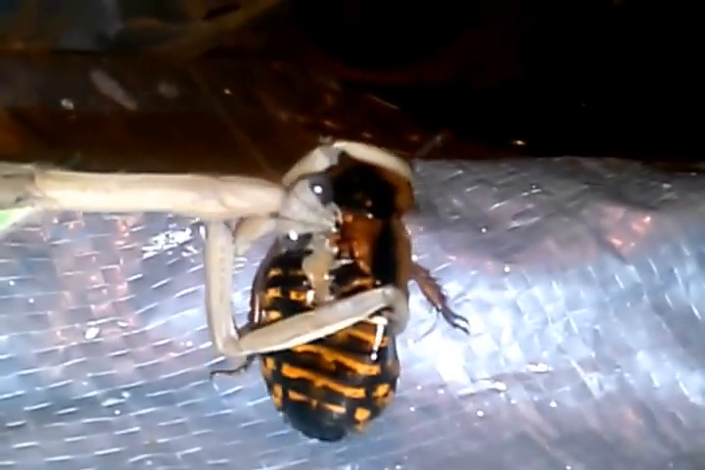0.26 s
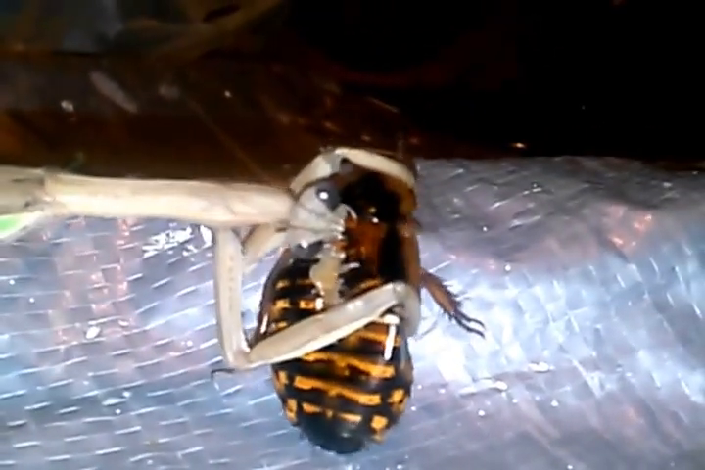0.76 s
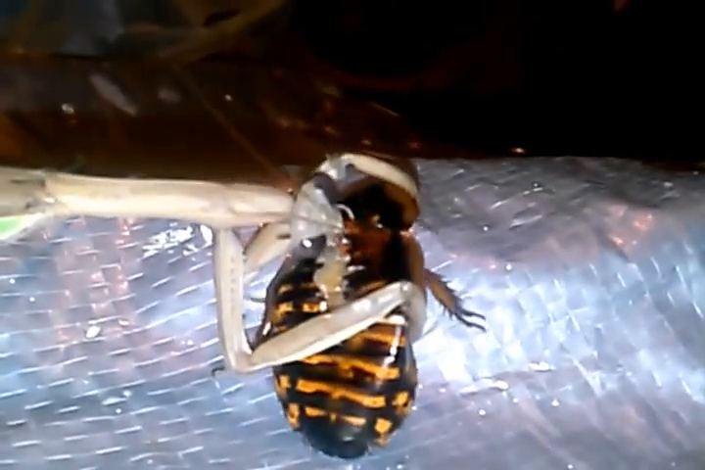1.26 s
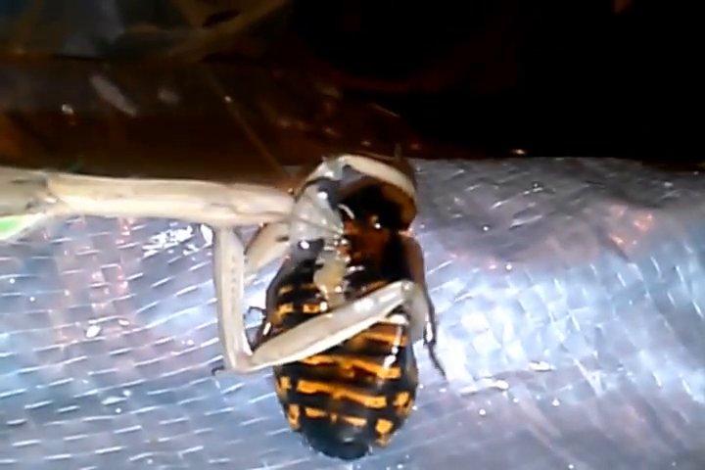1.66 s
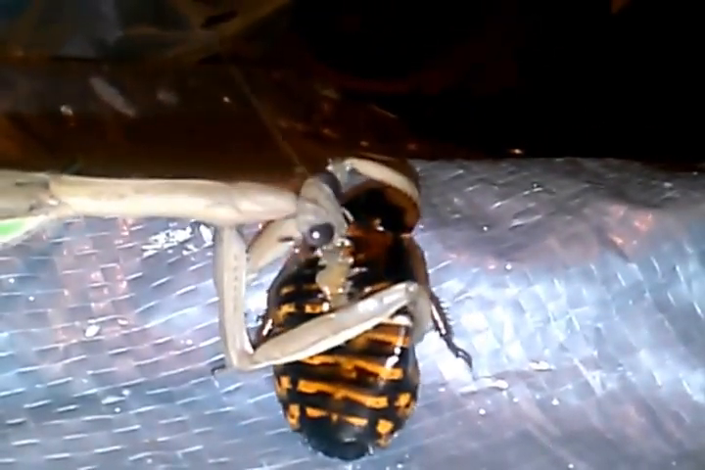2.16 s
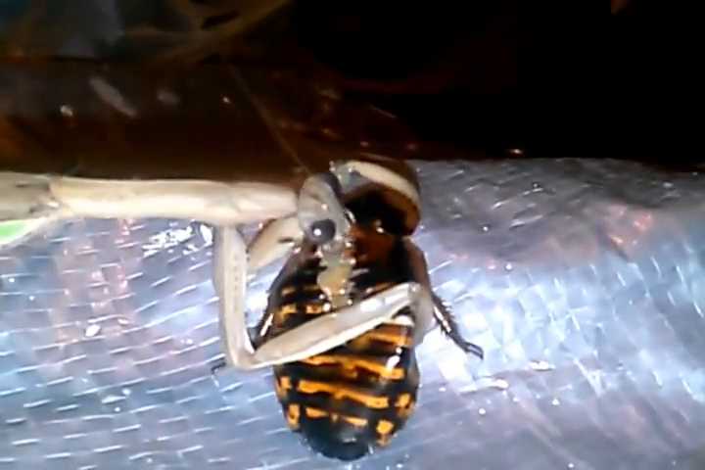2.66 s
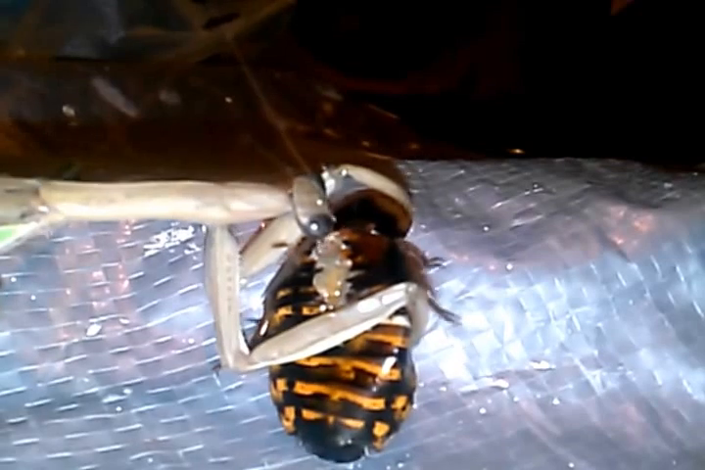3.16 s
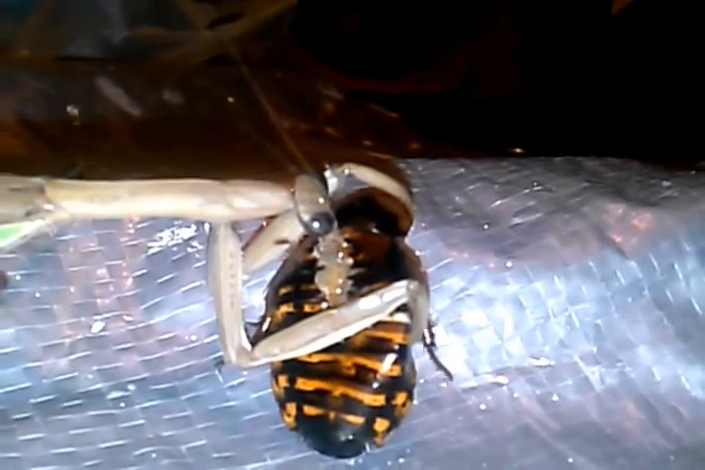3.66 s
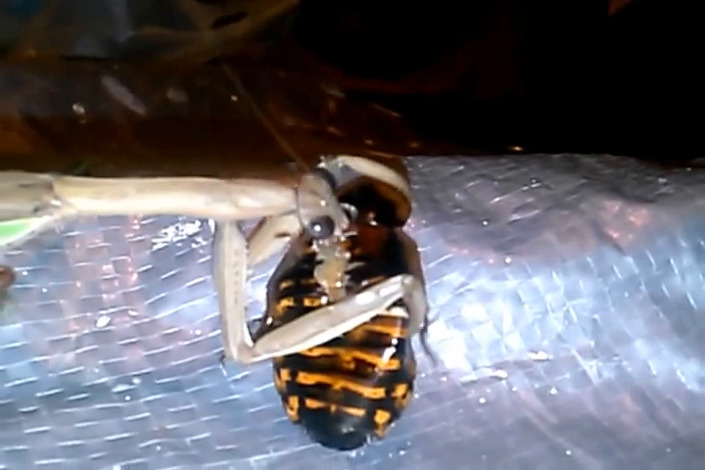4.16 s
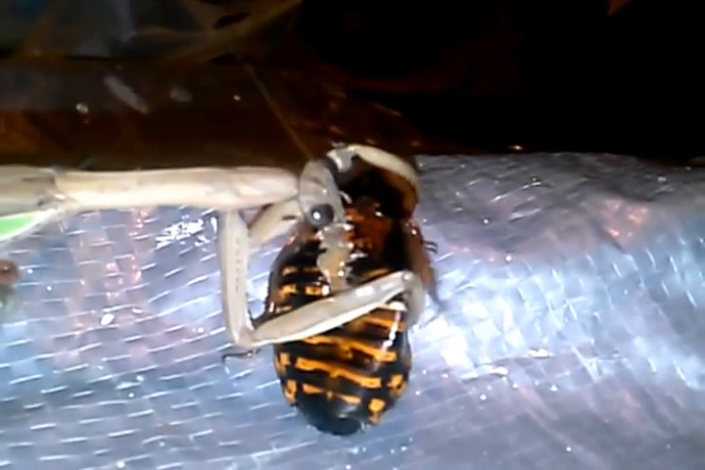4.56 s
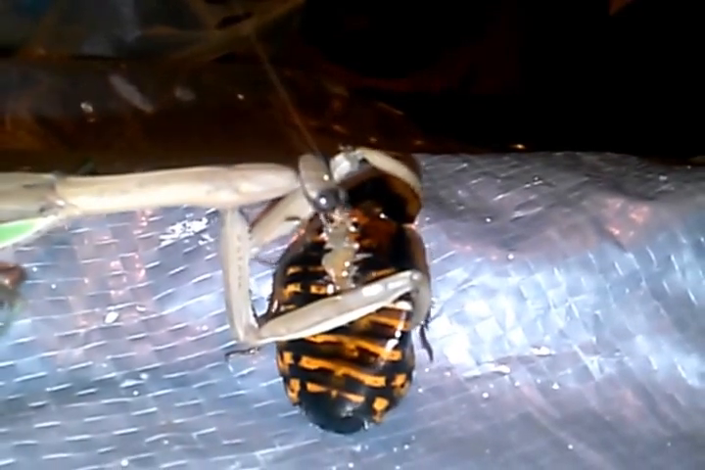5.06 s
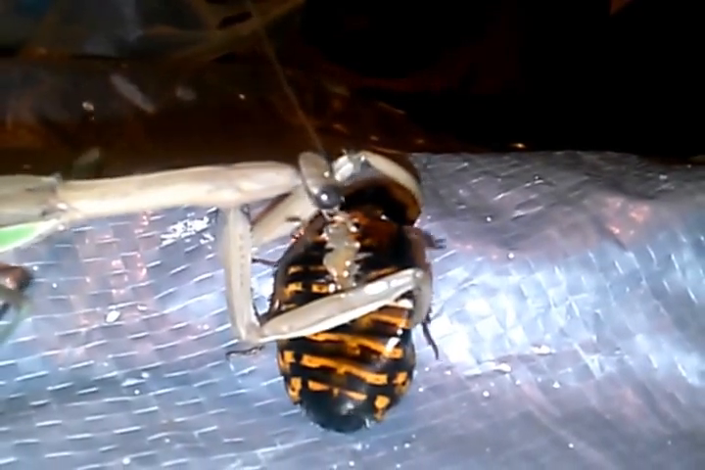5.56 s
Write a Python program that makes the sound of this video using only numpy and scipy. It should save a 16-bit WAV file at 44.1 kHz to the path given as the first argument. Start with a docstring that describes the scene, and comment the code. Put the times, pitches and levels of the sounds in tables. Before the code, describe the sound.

A mantis chewing a roach: a quick flurry of small crunches and handling bumps, then sparse single ticks above quiet rumble and airy hiss.

```python
"""Shell ticks over a low rumble, with rubbing, a short groan and soft thumps: a mantis chews a roach in a quiet room,
heard close by one hand-held microphone. Ticks, thumps and rubbing are impulses ringing damped modes; the groan is a
sliding tone from the hand on the housing. Rumble, drone, murmur and a hiss that swells and sinks are noise in
flickering bands; the background dips briefly now and then. Faint narrow patches, mostly near 3 and 5 kHz, are tones
of shivering pitch."""
import sys
import numpy as np
from scipy import signal
from scipy.fft import rfft, irfft, next_fast_len
from scipy.io import wavfile

SR = 44100
rng = np.random.default_rng(int(sys.argv[2]) if len(sys.argv) > 2 else 0)


def undo_db(level):
    """Turn decibels back into plain size, where 20 dB means ten times bigger."""
    steps = np.asarray(level, float) / 20
    return 10 ** steps


def transcribe(signal):
    """Save signal, clipped to [-1, 1], as a 16-bit WAV file at the path in sys.argv[1]."""
    frames = np.atleast_2d(signal).T
    limited = np.clip(frames, -1, 1)
    pcm = np.round(limited * 32767).astype(np.int16)
    wavfile.write(sys.argv[1], SR, pcm)


N = 256662   # length [samples]

# low background, restless while the hand settles: (time [s], deep rumble level [dB],
# level of the thin murmur between drone and hiss [dB])
LOW_AIR = [(0, -35.5, -63.5), (.55, -37, -57), (.85, -40.5, -58), (1.0, -43.5, -64), (1.6, -39, -59.5),
           (2.15, -41.5, -68), (2.55, -42.5, -62), (3.35, -38.5, -58), (3.85, -44.5, -62),
           (4.3, -44, -61.5), (4.55, -41.5, -60), (5.1, -43, -58), (5.82, -42.5, -61.5)]


def rms_one(x):
    """Normalization: divides a signal by its root mean square."""
    return x / np.sqrt(np.mean(x ** 2) + 1e-20)


def in_time(rows):
    """Linear interpolation: turns timed rows into one curve per column."""
    times, *columns = np.transpose(rows)
    return [np.interp(np.arange(N) / SR, times, column) for column in columns]


def drift(rate):
    """Low-passed noise: a chance curve of spread 1 from two equal poles at rate [Hz]."""
    pole = np.exp(-80 * np.pi * rate / SR)   # one step is 40 samples
    steps = rng.standard_normal(N // 40 + 2002)
    slow = signal.lfilter([1], [1, -2 * pole, pole * pole], steps)[2000:]
    return np.interp(np.arange(N) / 40, np.arange(len(slow)), rms_one(slow))


def ring(length, hz, t60):
    """Damped oscillation: a sine under an exponential decay of 60 dB in t60 [s]."""
    t = np.arange(length) / SR
    return np.sin(2 * np.pi * hz * t) * undo_db(-60 * t / t60)


def coloured(spectrum, patchy_db, flicker, tilt_db=0, count=12):
    """Subband modulation: shaped noise in overlapping bands that flicker partly together; rms 1."""
    size = next_fast_len(N)
    hz, density_db = np.transpose(spectrum)
    octave = np.log2(np.maximum(np.arange(size // 2 + 1) * SR / size, 1e-3))
    shape = undo_db(np.interp(octave, np.log2(hz), density_db, -200, -200))
    noise = rfft(rng.standard_normal(size)) * shape
    centres = np.linspace(np.log2(hz[1]), np.log2(hz[-2]), count)
    out, together = 0, drift(flicker)
    for k in range(count):
        weight = np.interp(octave, centres, np.arange(count) == k)
        band = irfft(noise * weight, size)[:N]
        sway_db = patchy_db * (0.54 * together + drift(flicker))
        # the lowest band takes minus half the tilt, the top quarter plus a quarter of it
        out = out + band * undo_db(sway_db + tilt_db * (min(k / count, .75) - .5))
    return rms_one(out)


def ticks():
    """Impulse response of modes: each crack rings near 1 kHz, with its own share of dry treble, and splinters."""
    # shell ticks: (time [s], strike level [dB], ring frequency [Hz], dry crack re ring [dB])
    strikes = [(0.064, -38.5, 960, -20), (0.177, -33, 1340, -25), (0.1941, -28.5, 1120, -6),
               (0.258, -40, 1060, -16), (.377, -38.5, 885, -3), (0.557, -30, 860, -23),
               (.786, -39, 1160, -20), (.808, -41, 1020, -23), (1.633, -38, 1300, -10),
               (2.581, -38.5, 1210, -18), (3.317, -37, 1310, -16), (3.6512, -32, 1250, 7.5),
               (3.652, -38, 1940, -3), (3.6528, -38, 1310, -5), (4.446, -38.5, 1140, -1)]
    # short modes of the dry crack: (frequency [Hz], level [dB], t60 [s])
    treble_modes = [(1820, 0, 0.0041), (2600, 2, 0.0035), (3300, -1, 0.0032), (4900, -5, 0.006)]
    ring_cycles = 12.8   # cycles of the body ring in its t60
    splinter_db, splinter_t60_s, splinters_per_s = -11, .025, 1200
    contact_hz = 3400   # low-pass that softens every contact

    crack = 0
    for k, (hz, mode_db, t60) in enumerate(treble_modes):
        crack = crack + (-1) ** k * undo_db(mode_db) * ring(4000, hz, t60)
    splinter = undo_db(splinter_db - 60 * np.arange(4000) / SR / splinter_t60_s)
    out = np.zeros(N + 4000)
    for start, strike_db, hz, crack_db in strikes:
        body = ring(4000, hz, ring_cycles / hz)
        chance = rng.random(4000) < splinters_per_s / SR
        slips = splinter * rng.standard_normal(4000) * chance
        slips[0] = 1   # the first break
        tick = signal.fftconvolve(slips, body + undo_db(crack_db) * crack)[:4000]
        out[round(start * SR):][:4000] += undo_db(strike_db) * tick
    return signal.sosfilt(signal.butter(2, contact_hz, fs=SR, output="sos"), out[:N])


def rub():
    """Stochastic excitation of modes: dense uneven slips set off short rings near 1 kHz."""
    # rough rubbing: (time [s], level [dB])
    strokes = [(0.05, -72), (0.07, -53), (0.086, -63), (0.138, -53.5), (0.185, -56), (0.225, -46),
               (0.322, -61.5), (0.372, -56), (0.42, -59)]
    # modes that the slips excite: (frequency [Hz], relative level [dB], t60 [s])
    rub_modes = [(840, -4, 0.042), (1017, 8, 0.036), (1140, -4, 0.02), (1390, -2, 0.018)]
    slips_per_s = 900

    silent_before, silent_after = (strokes[0][0] - .01, -120), (strokes[-1][0] + .02, -120)
    stroke_db, = in_time([silent_before] + strokes + [silent_after])
    # the modes share the moments of slip but not their strengths
    slips = rng.standard_normal((len(rub_modes), N)) * (rng.random(N) < slips_per_s / SR)
    rough = 0
    for row, (hz, mode_db, t60) in zip(slips, rub_modes):
        rough = rough + undo_db(mode_db) * signal.fftconvolve(row, ring(3000, hz, t60))[:N]
    return undo_db(stroke_db) * rms_one(rough)


def groan():
    """Frequency and amplitude modulation: a sliding, unsteady tone of the housing with a third harmonic."""
    # two groans, each a list of: (time [s], frequency [Hz], level [dB])
    glides = [
        [(0.12, 300.4, -77), (0.128, 304, -37), (0.136, 322, -32.5), (0.155, 287, -68)],
        [(0.172, 353, -42), (0.179, 342, -35.5), (0.187, 360, -42), (0.194, 357, -40.5), (0.222, 248.6, -30.5),
         (0.234, 241, -28.5), (0.26, 239, -59)],
    ]
    rough_db, rough_hz = 2.2, 56   # chance swing of the level
    shiver_share, shiver_hz = .05, 69   # chance swing of the pitch, as a share of it
    overtone_db = -16

    out, t = np.zeros(N), np.arange(N) / SR
    for rows in glides:
        hz, tone_db = in_time(rows)
        fade = np.clip(np.minimum(t - rows[0][0], rows[-1][0] - t) / 0.0066, 0, 1)
        phase = 2 * np.pi * np.cumsum(hz * (1 + shiver_share * drift(shiver_hz))) / SR
        tone = np.sin(phase) + undo_db(overtone_db) * np.sin(3 * phase)
        out += np.sqrt(2) * undo_db(tone_db + rough_db * drift(rough_hz)) * fade * tone
    return out


def thumps():
    """Heavy damping: soft pushes on the housing start a low swing that dies fast, its onset dulled."""
    # pushes: (time [s], push level [dB], ring frequency [Hz], t60 [s])
    pushes = [(0.087, -39, 75, 0.075), (.104, -26.5, 110, 0.052), (.262, -37, 298, 0.057),
              (0.223, -22.5, 31, 0.18), (0.445, -27, 30, 0.091), (0.561, -20.5, 34.8, 0.059),
              (.807, -18.5, 97, 0.052), (0.861, -24.5, 91, 0.039), (1.06, -29.5, 28.7, 0.3),
              (1.171, -23, 28, 0.12), (1.34, -33.5, 204, 0.067), (2.35, -31, 35, 0.11),
              (2.692, -28, 35.3, 0.054), (5.049, -25, 47, 0.14)]
    out = np.zeros(N + 9000)
    for start, push_db, hz, t60 in pushes:
        out[round(start * SR):][:9000] += undo_db(push_db) * ring(9000, hz, t60)
    return signal.sosfilt(signal.butter(2, 450, fs=SR, output="sos"), out[:N])


def trill():
    """Frequency modulation: fast chance shivers spread each short tone into a narrow band."""
    # narrow airy patches: (start [s], length [s], frequency [Hz], level [dB])
    patches = [(0.49, 0.17, 3110, -55), (1.066, .092, 3150, -55), (1.09, 0.086, 4430, -50.5),
               (1.403, 0.032, 3190, -49), (1.483, .06, 2820, -54), (1.698, 0.043, 2990, -49),
               (1.768, .035, 3030, -56), (1.827, 0.047, 2940, -51), (2.304, 0.096, 3180, -48),
               (2.83, 0.15, 3110, -52.5), (2.893, 0.08, 4640, -51), (3.521, 0.018, 2920, -45),
               (4.497, 0.13, 5020, -54), (4.666, 0.14, 3006, -54), (5.056, 0.1, 2814, -57),
               (5.383, 0.086, 2920, -56), (5.477, 0.095, 2940, -51.5), (5.5, 0.071, 3200, -54),
               (5.644, 0.037, 2980, -51)]
    width_share, shiver_hz = .017, 210.0   # chance swing of the pitch, as a share of it
    throb_db, throb_hz = 2.5, 47   # chance swing of the level
    faint_db, faint_s = -63, .07   # level and mean length of fainter patches that come by chance

    out, t = np.zeros(N), np.arange(N) / SR
    shiver = np.cumsum(drift(shiver_hz)) / SR
    throb = undo_db(throb_db * drift(throb_hz))
    when, stretch, pitch, upper = rng.random((24, 4)).T
    faint_hz = np.where(upper < .6, 2750 + 500 * pitch, 4300 + 1000 * pitch)
    faint = [(s * N / SR, faint_s * (.5 + k), f, faint_db) for s, k, f in zip(when, stretch, faint_hz)]
    for start, duration, hz, patch_db in patches + faint:
        fade = np.clip(np.minimum(t - start, start + duration - t) / 0.0056, 0, 1)
        out += undo_db(patch_db) * fade * np.sin(2 * np.pi * hz * (t + width_share * shiver))
    return out * throb


def hiss():
    """Spectral tilt: broad noise that brightens in steps and dulls as it sinks, with a light flutter."""
    # course of the hiss: (time [s], level [dB], tilt [dB])
    swell = [(0, -55, -12), (.14, -50, -13), (.325, -49.5, -1), (.34, -47, 5), (.65, -48, -3.5),
             (.75, -50.5, -12.5), (1.03, -56, -16), (1.08, -47.5, -3), (1.27, -48, 2), (1.6, -43.5, 3),
             (1.85, -49.5, -4), (2.2, -49.5, -6.5), (2.43, -50.5, -7), (2.46, -45.5, 1), (3.0, -46, -0.5),
             (3.4, -44.5, 0), (3.72, -45.5, 2), (3.8, -46.5, 4.5), (4.8, -47.5, 1.5), (5.1, -47, 6),
             (5.66, -48, 1.5), (5.82, -54, -16)]
    # its spectrum: (frequency [Hz], relative density per Hz [dB])
    hiss_spectrum = [(1350, -13), (2300, -11), (2900, -1), (3930, -4), (4370, 2), (5080, 3), (7900, -2.5),
                     (14100, -19), (15900, -25)]
    flutter_db, flutter_hz = 0.9, 14.3
    hiss_db, bright_db = in_time(swell)
    noise = coloured(hiss_spectrum, patchy_db=1.69, flicker=12.5, tilt_db=bright_db, count=36)
    return undo_db(hiss_db + flutter_db * drift(flutter_hz)) * noise


def whine():
    """Resonant filtering: noise sent twice through a narrow resonance leaves thin lines that come and go."""
    # faint lines in the hiss: (frequency [Hz], resonance width [Hz], level [dB])
    thin_lines = [(2990, 110, -66), (3183, 40, -68), (2400, 60, -77), (2730, 120, -70)]
    sway_db, sway_hz = 4.5, 2.9
    out = 0
    for hz, width_hz, line_db in thin_lines:
        pole = np.exp(-np.pi * width_hz / SR)
        resonance = [1, -2 * pole * np.cos(2 * np.pi * hz / SR), pole * pole]
        once = signal.lfilter([1, 0, -1], resonance, rng.standard_normal(N))
        line = signal.lfilter([1], resonance, once)
        out = out + undo_db(line_db + sway_db * drift(sway_hz)) * rms_one(line)
    return out


def murmur():
    """Band-limited noise: a thin, patchy murmur fills the range between drone and hiss."""
    # its spectrum: (frequency [Hz], relative density per Hz [dB])
    murmur_spectrum = [(530, -4.5), (900, 1), (1100, -4), (1350, -2.5), (1580, -7.5), (2500, -6),
                       (3250, -8), (5500, -120)]
    heave_db, heave_hz = 1.5, 3.2
    _, murmur_db = in_time(LOW_AIR)
    noise = coloured(murmur_spectrum, patchy_db=4.0, flicker=9.7, count=26)
    return undo_db(murmur_db + heave_db * drift(heave_hz)) * noise


def drone():
    """Spectral tilt: low noise of the room, at times fuller in its upper part."""
    # course of the drone: (time [s], level [dB], tilt [dB])
    drone_course = [(0, -48.5, -2), (.5, -46, 2), (.8, -46.5, 0), (1.1, -51, -1), (1.4, -50.5, -2),
                    (1.9, -49, -10), (2.2, -46, 6), (2.6, -47, -8), (2.85, -48, -4), (3.4, -46.5, 8),
                    (3.85, -51, 1), (4.2, -48.5, 4), (4.4, -48, -7), (4.72, -43, 6.5), (4.95, -48.5, -6),
                    (5.25, -47.5, -1), (5.45, -48.5, -3), (5.82, -50, 4)]
    # its spectrum: (frequency [Hz], relative density per Hz [dB])
    drone_spectrum = [(76, -17), (130, -1), (359, -0.5), (415, -9), (514, -7.5), (647, -11.5), (742, -9.5),
                      (1000, -22.5), (1300, -48), (2200, -120)]
    drone_db, full_db = in_time(drone_course)
    return undo_db(drone_db) * coloured(drone_spectrum, patchy_db=2.6, flicker=7, tilt_db=full_db, count=14)


def rumble():
    """Amplitude modulation: deep noise that heaves and shifts its tilt by chance."""
    # its spectrum: (frequency [Hz], relative density per Hz [dB])
    rumble_spectrum = [(2.9, -62), (5.0, 10), (21, -0.5), (36, -9), (55, -9.5), (97, -11.5), (200, -22.5),
                       (260, -31), (440, -120)]
    heave_db, heave_hz = 2.5, 5.6
    lean_db, lean_hz = 3.5, 1.7   # chance swing of the tilt
    rumble_db, _ = in_time(LOW_AIR)
    lean = lean_db * drift(lean_hz)
    noise = coloured(rumble_spectrum, patchy_db=2.5, flicker=29, tilt_db=lean, count=6)
    return undo_db(rumble_db + heave_db * drift(heave_hz)) * noise


def mic_noise():
    """Self-noise: the microphone adds a nearly steady treble noise of its own."""
    # its spectrum: (frequency [Hz], relative density per Hz [dB])
    self_spectrum = [(6000, -20), (9000, -2), (12000, 0), (15000, -3), (15900, -4)]
    self_noise_db = -71
    return undo_db(self_noise_db) * coloured(self_spectrum, patchy_db=.2, flicker=11.0, count=3)


def dips():
    """Gain modulation: the background level sinks in brief smooth hollows of raised-cosine shape."""
    # dips: (centre time [s], depth [dB], half length [s])
    hollows = [(.7, -3, 0.046), (1.922, -4.5, 0.044), (2.044, -6.5, 0.018), (2.192, -3.5, 0.014),
               (2.797, -3, 0.068), (3.992, -6, 0.083), (4.206, -4.5, 0.067), (4.84, -2, 0.055),
               (5.17, -3.5, 0.029), (5.752, -6, 0.053)]
    t = np.arange(N) / SR
    gain_db = 0
    for centre, depth_db, half in hollows:
        gain_db = gain_db + depth_db * np.cos(np.pi / 2 * np.clip((t - centre) / half, -1, 1)) ** 2
    return undo_db(gain_db)


def scene():
    """Superposition: the dipping background and the nearer sounds add up, alike in both channels."""
    background = (rumble() + drone() + murmur() + hiss() + mic_noise() + whine()) * dips()
    handling = rub() + groan() + thumps()
    mono = background + trill() + ticks() + handling
    return np.array([mono, mono])


def roll_off(x):
    """The treble ends steeply here."""
    return signal.sosfilt(signal.butter(12, 15760, fs=SR, output="sos"), x)


def record(dry):
    """Unity gain: the finished mix is passed on at its own level in both channels."""
    return roll_off(dry)


dry = scene()
out = record(dry)
transcribe(out)
```